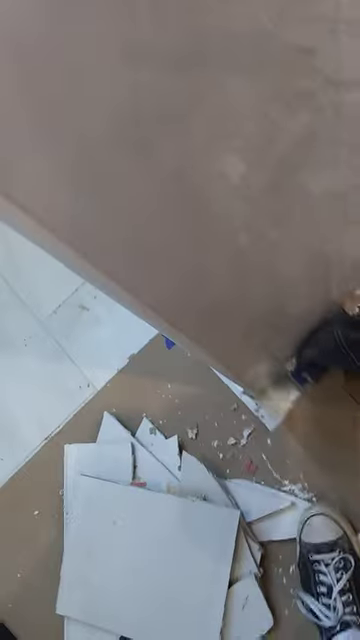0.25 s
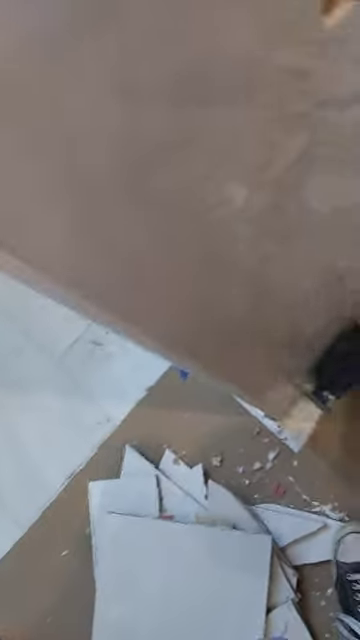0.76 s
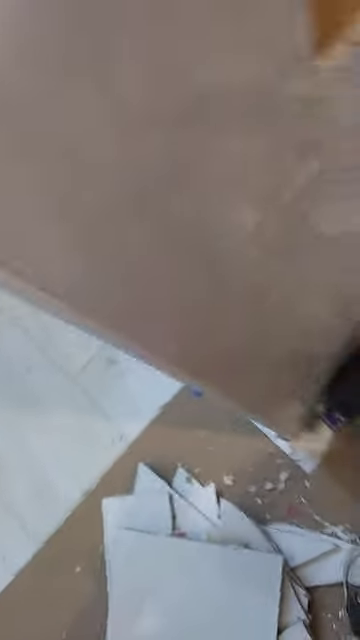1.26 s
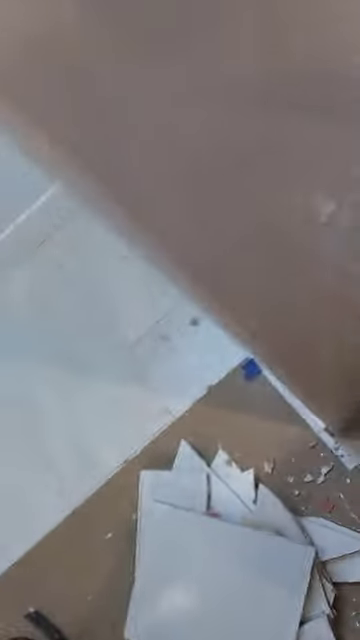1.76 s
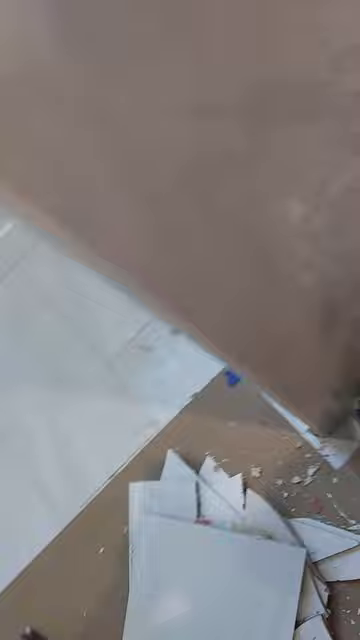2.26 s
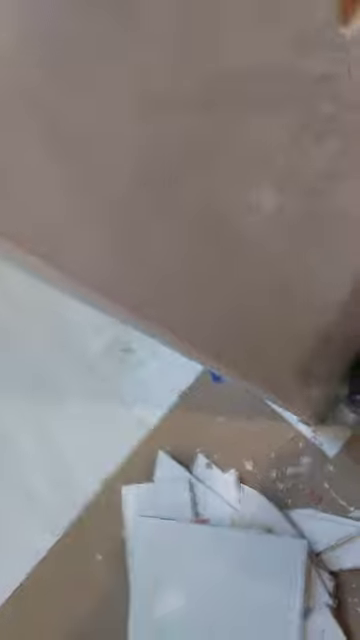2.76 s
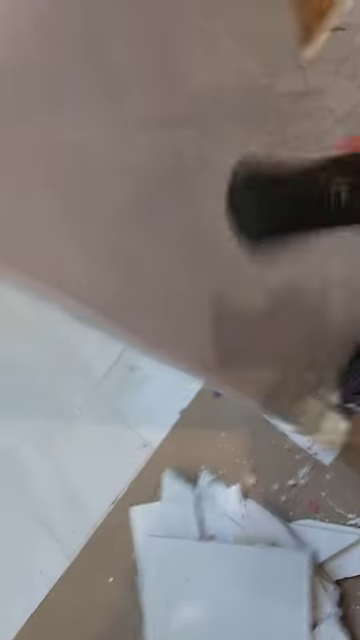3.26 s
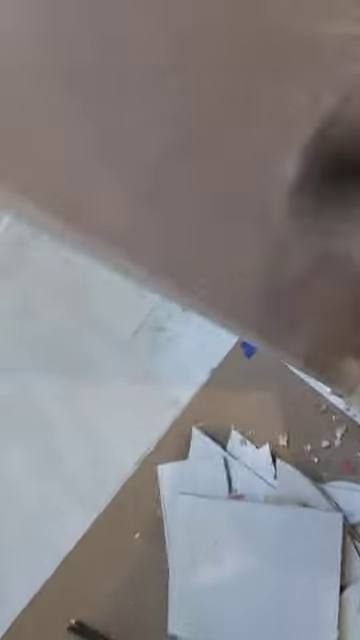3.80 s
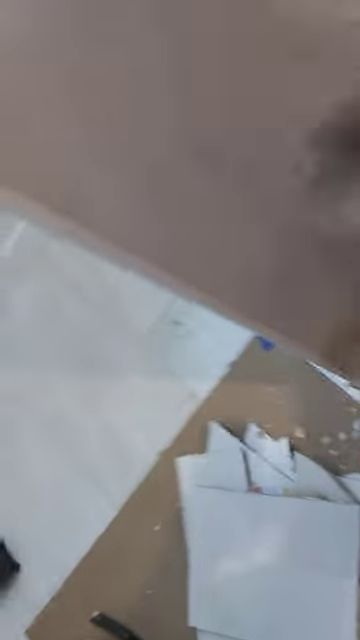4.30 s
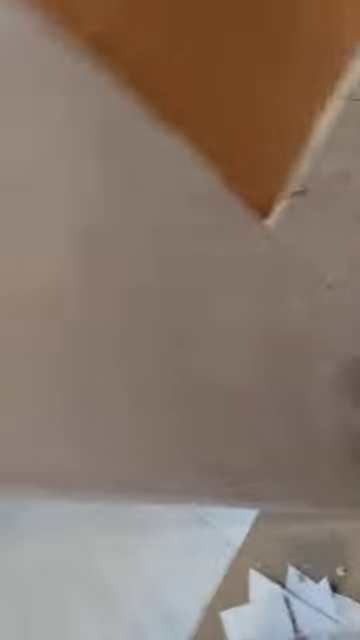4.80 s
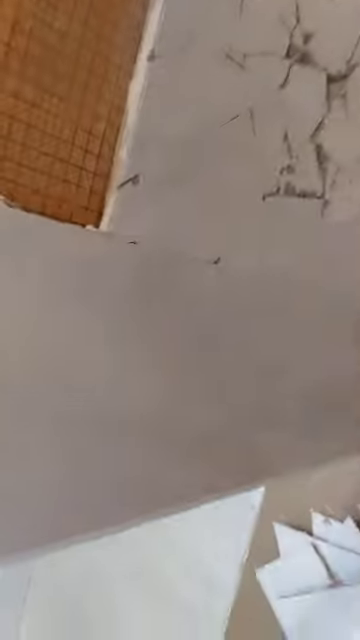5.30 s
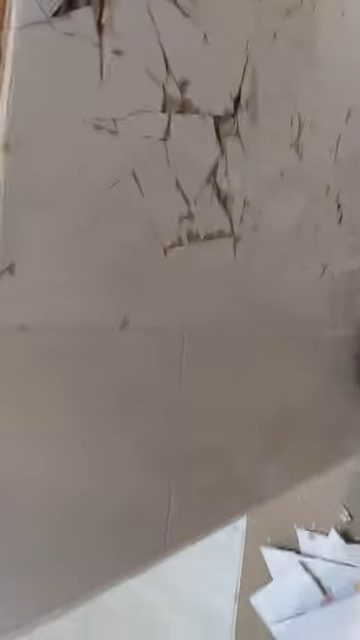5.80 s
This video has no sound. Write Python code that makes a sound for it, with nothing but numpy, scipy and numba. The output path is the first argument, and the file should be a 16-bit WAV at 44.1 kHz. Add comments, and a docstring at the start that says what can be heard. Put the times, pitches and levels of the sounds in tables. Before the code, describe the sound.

Close up in a bare, hard-surfaced room, a hammer hits a tiled wall about every half second. Each blow is a hollow boom with a sharp ceramic crack, some duller, some brighter and more ringing. Shards clatter, chips ping on the floor and grit ticks between blows. A bright tail of about a second links the blows; the loudest hits sound squashed by the microphone.

```python
"""A hammer breaks ceramic tile off a shower wall in a bare, hard room, heard close up.
Each blow is two filtered noise bursts, a boom of the wall and a crack of the tile, plus a push into the room.
Rebound or cracking tile, then shards, clatter and ring as decaying sines; chips tick and ping; grit only ticks.
Decaying noise makes the short answer near the floor and the room's tail of about a second; faint air lies below.
A quick limiter and soft clipping flatten the loudest moments."""
import sys
import numpy as np
from scipy import signal
from scipy.fft import rfft, irfft, next_fast_len
from scipy.io import wavfile
from numba import njit

SR = 44100
rng = np.random.default_rng(int(sys.argv[2]) if len(sys.argv) > 2 else 0)


def to_wav(s):
    """Save 16-bit WAV."""
    ch = np.atleast_2d(s).T  # columns
    pcm = np.round(np.clip(ch, -1, 1) * 32767)  # PCM
    wavfile.write(sys.argv[1], SR, pcm.astype(np.int16))


N = 266805
LEAD = SR // 4  # samples rendered before the start


def amp(db):
    """dB to amplitude gain."""
    return 10 ** (np.asarray(db) / 20)


def along(points, hz):
    """Interpolate (f/Hz, value) points on a log-frequency axis."""
    f, v = np.transpose(points)
    return np.interp(np.log(hz + 1), np.log(f + 1), v)


def bump(hz, centre_hz, width_octaves):
    """Unit-height Gaussian bell on the log-frequency axis."""
    return np.exp(-.5 * (np.log2((hz + 1) / centre_hz) / width_octaves) ** 2)


def coloured(x, db_of):
    """Minimum-phase filter with gain db_of(Hz) in dB, built by folding the cepstrum."""
    size = 2 * len(x)
    gain = amp(db_of(np.fft.rfftfreq(size, 1 / SR))) + 1e-6
    cepstrum = irfft(np.log(gain), size)
    cepstrum[1:size // 2] *= 2
    cepstrum[size // 2 + 1:] = 0
    response = np.exp(rfft(cepstrum))
    return irfft(rfft(x, size) * response, size)[:len(x)]


def burst(t, t60_s):
    """Exponentially dying white noise of energy 1."""
    x = rng.standard_normal(len(t)) * amp(-60 * t / t60_s)
    return x / np.linalg.norm(x)


def impulse(t):
    """Unit impulse at t = 0."""
    return 1. * (t == 0)


def add(track, s, x):
    """Mix x into track at time s."""
    part = track[LEAD + round(s * SR):][:len(x)]
    part += x[:len(part)]


# hammer blows: [t/s, level/dB, thud/dB, boom f/Hz, boom/dB, crack/dB, snap/dB, fizz/dB,
#                tile ring f/Hz, ring/dB]; all dB relative
BLOWS = [(-.06, 5.5, -2.5, 507, 3, -5.5, -11.5, -12, 4570, 5.5),
         (0.541, 5.5, -4.5, 477, 5.5, -3, -11, -5.5, 2570, -5),
         (1.1192, -1, -0.5, 970, 2.5, 5, -0.5, 7.5, 6500, 3.5),
         (1.7401, -2.5, -4.5, 830, 7.5, 6, 5, 6, 7500, 6.5),
         (2.2309, 0.5, -10, 1050, 8.5, -5, -5.5, -1.5, 9640, 11.5),
         (2.654, -0.5, -8, 850, 5, -4, -3.5, 1.5, 6240, 6),
         (2.9902, 1, 0, 660, 6.5, -5.5, -5, -6.5, 7460, 0), (3.3563, 6, -3, 450, 2, -7, -14, -13, 1554, 6),
         (3.8734, 4.5, -1.5, 452, 3.5, -5.5, -16, -9, 8100, 6),
         (4.3915, 4, -0.5, 457, 3, -5, -15.5, -8.5, 1040, 5),
         (4.9179, 2, 1, 470, 5.5, -3, -8.5, 1, 9900, 3), (5.522, -1, 3, 595, 3.5, -4.5, -7, 11, 4620, 4)]
# wall colour, shared by blows and air: [f/Hz, gain/dB]
WALL = [(35, -114), (60, -30), (283, -5), (644, -7), (1470, -10.5), (1990, -8.5), (3500, -18), (4220, -15),
        (5220, -17), (7600, -15), (13700, -32), (15400, -29), (16500, -45)]
KNOCK_DB, KNOCK_PER_CRACK = -1.64, 0.74  # gain near 2 kHz: offset, dB per dB of crack
BOOM_OCTAVES, RING_OCTAVES = .38, .04
SPLIT_HZ = 1500  # boom below, crack above
BOOM_T60_S, CRACK_T60_S = .11, .034


def blows():
    """Wall board booms low and long, breaking glaze cracks high and short; an impulse feeds the room."""
    near, push = np.zeros(LEAD + N), np.zeros(LEAD + N)
    t = np.arange(4096) / SR

    def low(hz):  # power share of the boom
        return 1 / (1 + (hz / SPLIT_HZ) ** 4)

    for s, db, thud_db, boom_hz, boom_db, crack_db, snap_db, fizz_db, ring_hz, ring_db in BLOWS:
        knock_db = KNOCK_DB + KNOCK_PER_CRACK * crack_db
        shape = [(250, thud_db), (1100, 0), (2200, knock_db),
                 (3500, crack_db), (8500, snap_db), (13000, fizz_db)]
        # random treble ripple, drawn anew for each blow, roughens its colour
        ripple_db = 1.7 * rng.standard_normal(50)
        ripple_hz = np.linspace(0, SR / 2, len(ripple_db))

        def colour(hz):
            boom_peak = boom_db * bump(hz, boom_hz, BOOM_OCTAVES)
            ring_peak = ring_db * bump(hz, ring_hz, RING_OCTAVES)
            ripple = (1 - low(hz)) * np.interp(hz, ripple_hz, ripple_db)
            return along(WALL, hz) + along(shape, hz) + boom_peak + ring_peak + ripple

        boom = coloured(burst(t, BOOM_T60_S), lambda hz: colour(hz) + 10 * np.log10(low(hz) + 1e-9))
        crack = coloured(burst(t, CRACK_T60_S), lambda hz: colour(hz) + 10 * np.log10(1 - low(hz) + 1e-9))
        add(near, s, amp(db + 25) * boom + amp(db + 35) * crack)
        add(push, s, amp(db + 8.5) * coloured(impulse(t), colour))
    return near, push


# modes per piece, "a" hammer rebound or cracking tile, others shards: [f/Hz, level/dB, t60/s]
CONTACT_MODES = { "a": [(2620, -1, 0.0038), (4430, -5, 0.014), (6120, -2.5, 0.0068)],
                 "b": [(3660, -18, 0.31), (4570, -1, 0.018), (5114, 2.5, 0.037), (7500, 0, 0.012),
                 (9200, -15, 0.034), (10900, -20, 0.089), (13900, -2, .012)], "c": [(4200, 4, 0.0053),
                 (6500, -7, 0.032), (8000, -12, .015)], "d": [(3540, -7, 0.06), (4283, -1, 0.092),
                 (6860, -18, 0.052), (8150, -12, 0.045), (10000, -9.5, 0.036), (11800, -23, .04),
                 (13900, -21, .02), (14900, -28, .02)], "e": [(4230, -4, 0.059), (6440, -2, 0.033),
                 (10270, -9, 0.048)], "f": [(5370, -24, 0.016), (11040, -3.5, 0.036), (15480, -5, 0.036)], }
# hammer rebound or cracking tile ("a"), then shards landing and bouncing: [t/s, level/dB, piece]
CONTACTS = [(.614, 0.5, "a"), (1.4896, -12.5, "b"), (1.502, -17, "b"), (1.506, -14.5, "b"),
            (1.510, -17, "b"), (2.1205, -8, "c"), (2.132, -5.5, "c"), (2.141, -15.5, "c"), (2.152, -9, "c"),
            (3.6996, -6.5, "d"), (3.709, -7, "d"), (3.7185, -8.5, "d"), (3.732, -5.5, "d"),
            (3.7445, -9, "d"), (5.141, -18, "e"), (5.338, -14, "f")]
# per piece: [clatter re ring/dB, room feed/dB]
CONTACT_MIX = {"a": (9.7, -30), "b": (24.8, -45), "c": (21.8, -37.5), "d": (17, -39), "e": (6.7, -39),
               "f": (19, -42)}
# clatter colour: [f/Hz, gain/dB]
CLATTER = [(300, -49), (1200, -3.5), (3000, -5.5), (6000, 3.5), (10000, -15), (16000, -19)]
CLATTER_T60_S = .027
# random level and pitch scatter per contact (standard deviations), making the ringing less pure
MODE_SCATTER_DB, DETUNE_RATIO = 2.5, .006


def contacts():
    """Each contact clatters broadly and rings the damped modes of its piece; each piece has a room feed."""
    near, far = np.zeros(LEAD + N), np.zeros(LEAD + N)
    t = np.arange(SR // 5) / SR

    def clatter_colour(hz):
        return along(CLATTER, hz)

    for s, db, piece in CONTACTS:
        clatter_db, room_db = CONTACT_MIX[piece]
        scatter_db = rng.normal(0, MODE_SCATTER_DB, 8)
        bends = rng.normal(1, DETUNE_RATIO, 8)
        ring = np.zeros(len(t))
        for (hz, level_db, t60_s), more_db, bend in zip(CONTACT_MODES[piece], scatter_db, bends):
            decay = amp(level_db + more_db - 60 * t / t60_s)
            ring += decay * np.sin(2 * np.pi * hz * bend * t)
        clatter = coloured(burst(t, CLATTER_T60_S), clatter_colour)
        click = coloured(impulse(t), clatter_colour)
        add(near, s, amp(db) * (ring + amp(clatter_db) * clatter))
        add(far, s, amp(db + room_db) * (ring + amp(clatter_db) * click))
    return near, far


TICK_T60_S, TICK_HZ = .003, 11000  # t60 of a tick centred on TICK_HZ


def tick(t, hz, octaves):
    """Brief band of noise; a bigger, lower piece ticks longer."""
    t60_s = TICK_T60_S * np.sqrt(TICK_HZ / hz)
    return 4 * coloured(burst(t, t60_s), lambda f: 40 * bump(f, hz, octaves) - 40)


# chips pinging on the floor: [t/s, level/dB, f/Hz]
CHIPS = [(0.4399, -26, 9670), (0.9198, -29, 9400), (0.9941, -39, 12200), (1.6746, -12, 4700),
         (2.2553, -2, 9740), (2.34, -6, 5900), (2.3395, 4.5, 3160), (2.6374, -29, 13900), (2.68, -2, 6200),
         (3.3374, -1, 5200), (3.7704, -5, 4420), (3.807, 2, 3440), (3.8327, -6, 5140), (4.3194, -34, 12300),
         (4.356, -23, 4360), (4.875, -13, 3500), (4.8733, -12, 14400), (5.243, -14, 14200),
         (5.2865, -14.5, 4570), (5.2884, -17, 14600), (5.2999, -12, 14500), (5.3018, 7.5, 1690),
         (5.361, -11, 5030), (5.84, -8, 4530), (5.8795, -14, 14900), (5.888, -16.5, 6500),
         (5.896, -18, 9060), (5.9682, -3.5, 2540)]
CHIP_OCTAVES = .9  # tick width
PING_FROM_HZ, PING_SHARE = 2200, .38  # no ping below; full share from an octave above
PING_T60_S = .02


def chips():
    """A chip ticks around its pitch; all but the lowest also ring briefly on it."""
    out, t = np.zeros(LEAD + N), np.arange(2048) / SR
    for s, db, hz in CHIPS:
        share = PING_SHARE * np.clip(np.log2(hz / PING_FROM_HZ), 0, 1)
        ping = amp(-60 * t / PING_T60_S) * np.sin(2 * np.pi * hz * t)
        add(out, s, amp(db) * ((1 - share) * tick(t, hz, CHIP_OCTAVES) + share * ping))
    return out


# single grains of grit, loud and faint: [t/s, level/dB]
GRIT = [(0.3242, -34), (.35, -42), (0.8784, -33), (3.3368, -12), (3.5366, -7), (3.7918, -12), (3.7964, -1),
        (4.109, -20), (4.165, -25), (4.1774, -27), (4.2098, -22), (4.2264, -28), (4.2552, -27),
        (4.292, -15.5), (4.3074, -28), (4.366, -26), (4.7536, -33), (4.7712, -18), (4.8668, -20),
        (4.9354, -10), (5.1524, -16), (5.2046, -23), (5.3237, -8), (5.4615, -24), (5.865, -21), (5.94, -30),
        (5.9673, -17.5)]
GRIT_HZ, GRIT_OCTAVES = 10700, 2.2
FINE_PER_BLOW = 16


def grit():
    """Grains only tick; random fine grit falls 0.36-0.55 s after each blow."""
    out, t = np.zeros(LEAD + N), np.arange(2048) / SR
    grains = [(s, db, GRIT_HZ) for s, db in GRIT]
    draws = rng.random((len(BLOWS), FINE_PER_BLOW, 3))
    for blow, rows in zip(BLOWS, draws):
        for a, b, c in rows:
            s = blow[0] + 0.36 + 0.19 * a
            if s < N / SR:
                grains.append((s, -44 + 14 * b ** 2, 6000 * 2 ** c))
    for s, db, hz in grains:
        add(out, s, amp(db) * tick(t, hz, GRIT_OCTAVES))
    return out


def stall(x):
    """Hard surfaces around the floor give a short, dense answer: dying noise from 2 ms on."""
    t = np.arange(SR // 5) / SR
    tail = burst(t, 0.24) * (t > .002)
    return signal.fftconvolve(x, tail)[:len(x)]


# room decay: [f/Hz, t60/s]
ROOM = [(60, 0.21), (120, 0.18), (280, 0.67), (740, 1.083), (1940, 0.99), (5120, 0.88), (9000, 0.71),
        (15000, 0.35)]
ROOM_BUILDUP_S = .00067


def room(x):
    """Echoes build up, then each frequency dies at its own rate."""
    out, step = np.zeros(len(x) + 2 * SR), SR // 3
    # the tail noise is redrawn for each third of a second of input
    for k in range(0, len(x), step):
        hz, t, z = signal.stft(rng.standard_normal(SR), SR, nperseg=256)
        decay = amp(-60 * t / along(ROOM, hz)[:, None])
        tail = signal.istft(z * decay, SR, nperseg=256)[1]
        tail = tail * (1 - np.exp(-np.arange(len(tail)) / SR / ROOM_BUILDUP_S))
        wet = signal.fftconvolve(x[k:k + step], tail)
        out[k:k + len(wet)] += wet
    return out[:len(x)]


def air():
    """Steady background: white noise at -32 dB through the wall colour."""
    noise = amp(-32) * rng.standard_normal(LEAD + N)
    return coloured(noise, lambda hz: along(WALL, hz))


def scene():
    """Mix direct sources, near-floor answer, room and air; same signal on both channels."""
    blow, push = blows()
    contact, far = contacts()
    debris = chips() + grit()
    close = stall(amp(-5) * (contact + debris))
    echoes = room(push + far + amp(-44) * debris)
    mono = blow + contact + debris + close + echoes + air()
    return np.array([mono[LEAD:]] * 2)


@njit
def follow(x, attack, release):
    """Peak level with a fast rise and a slower fall; per-sample coefficients."""
    out, level = np.empty_like(x), 0.
    for i in range(len(x)):
        level += (abs(x[i]) - level) * (attack if abs(x[i]) > level else release)
        out[i] = level
    return out


BASS_HZ = 107
ATTACK_S, RELEASE_S, LIMIT_DB = .000093, .016, -3
TOP_HZ, EDGE_HZ = 15900, 16850  # upper band limit: first step, final cut


def record(dry):
    """Microphone drops the deep bass; then quick limiter, soft clipping and band limit."""
    x = signal.sosfilt(signal.butter(4, BASS_HZ, "high", fs=SR, output="sos"), dry)
    level = follow(x[0], 1 / (1 + SR * ATTACK_S), 1 / (1 + SR * RELEASE_S))
    x = x / np.maximum(1, level / amp(LIMIT_DB))
    x = x / (1 + np.abs(x / .8) ** 4) ** (1 / 4)  # saturates at 0.8
    size = next_fast_len(N + 8192)
    band = [(TOP_HZ - 200, 0), (TOP_HZ + 100, -22), (EDGE_HZ - 50, -30), (EDGE_HZ + 20, -90)]
    edge_db = along(band, np.fft.rfftfreq(size, 1 / SR))
    return irfft(rfft(x, size) * amp(edge_db), size)[:, :N]


dry = scene()
out = record(dry)
to_wav(out)
```